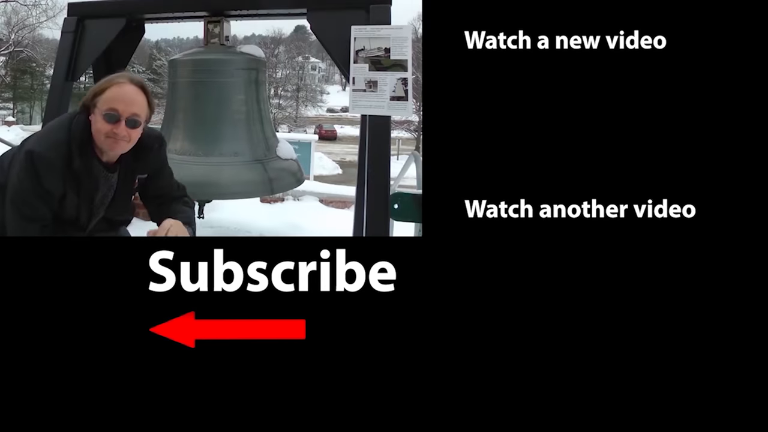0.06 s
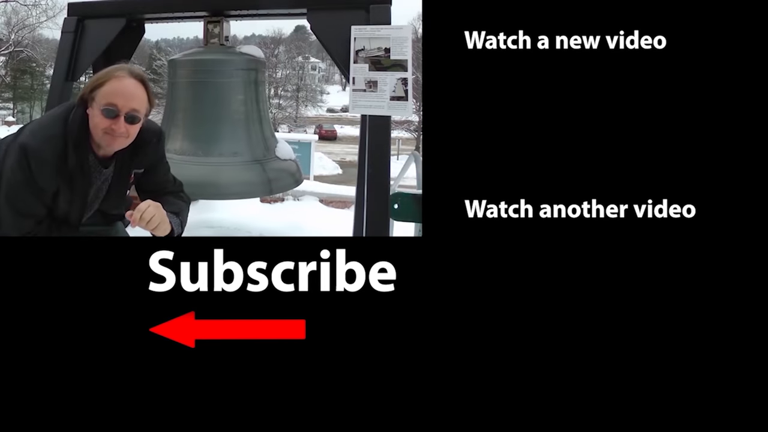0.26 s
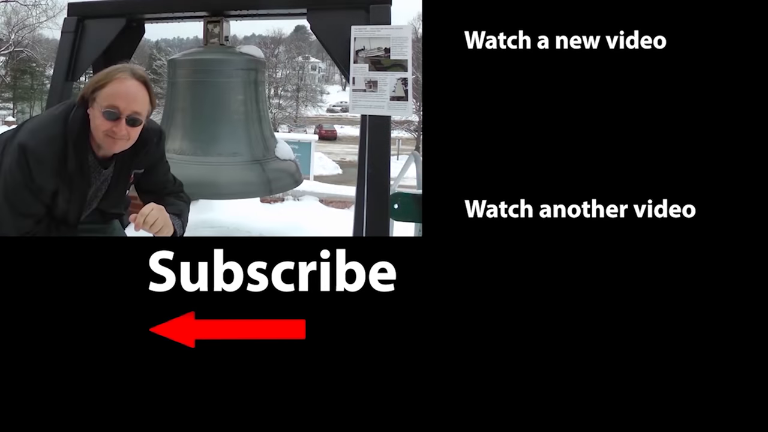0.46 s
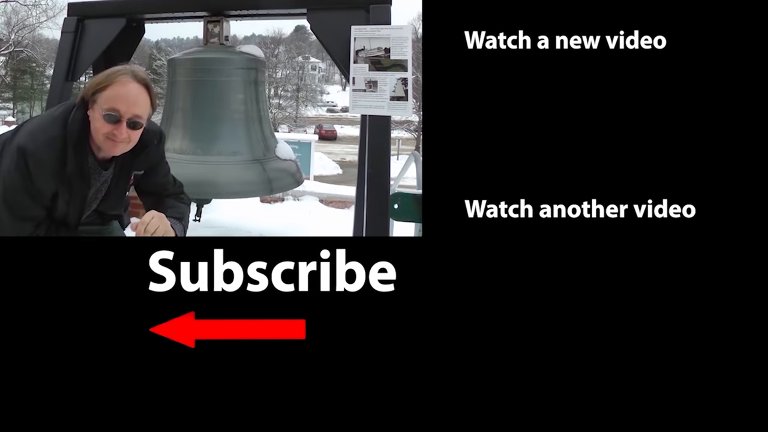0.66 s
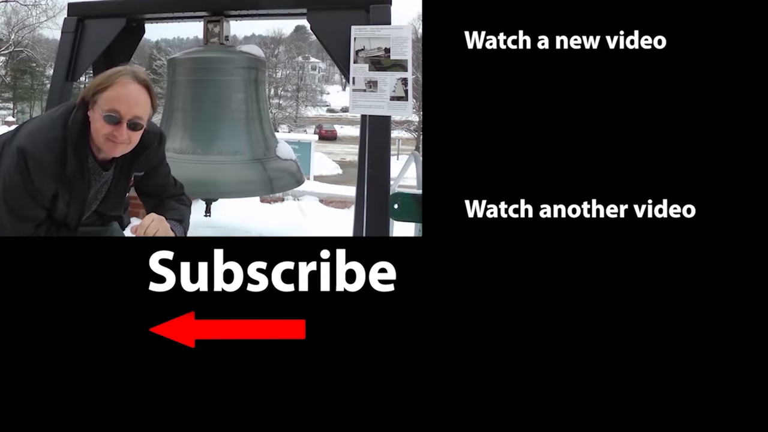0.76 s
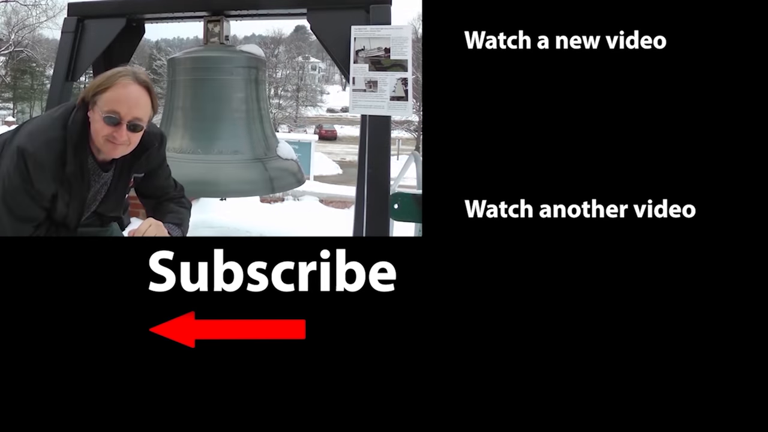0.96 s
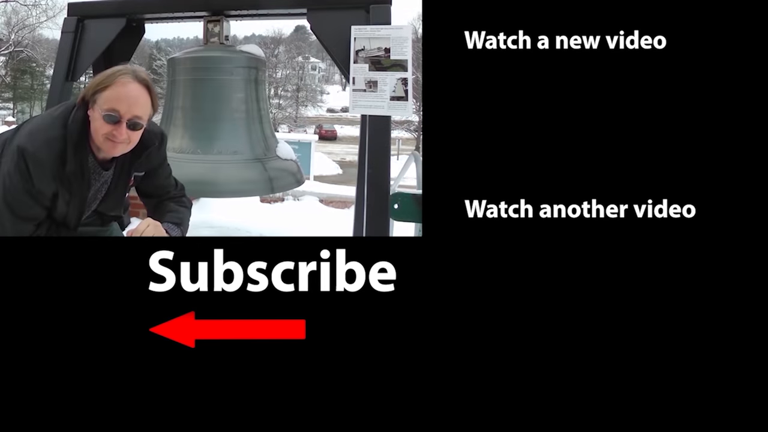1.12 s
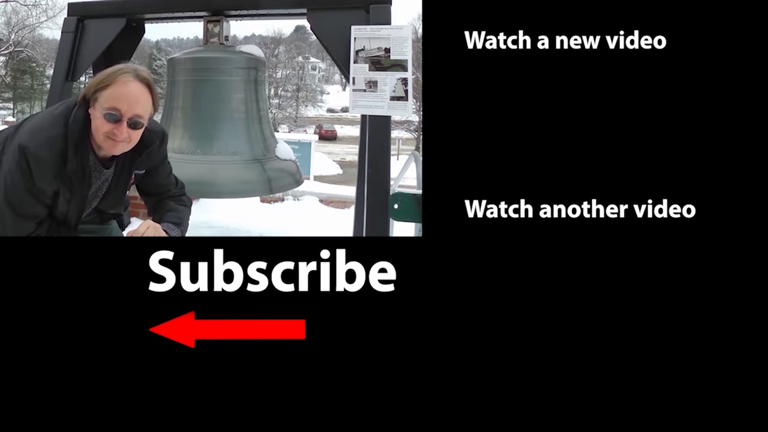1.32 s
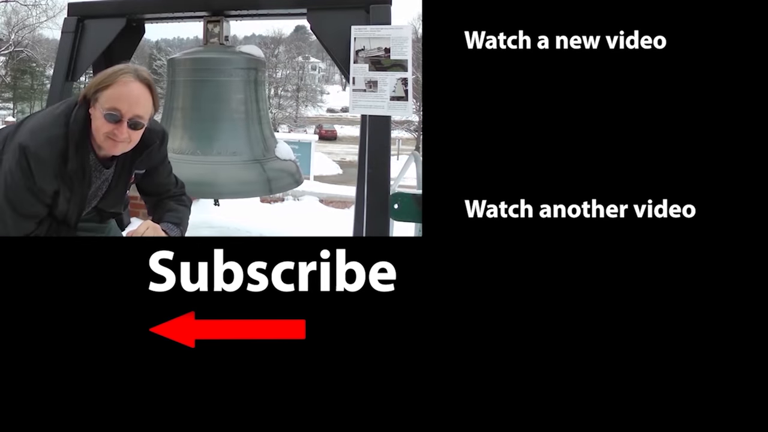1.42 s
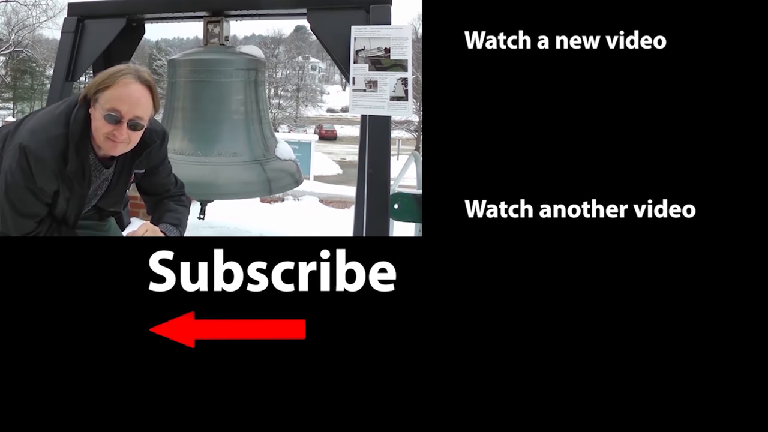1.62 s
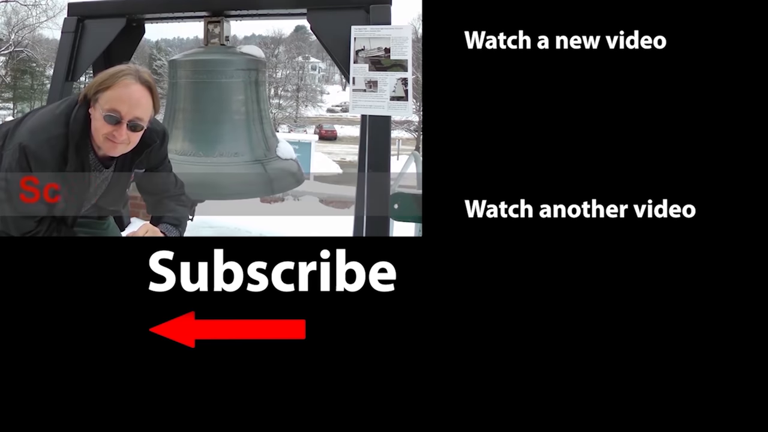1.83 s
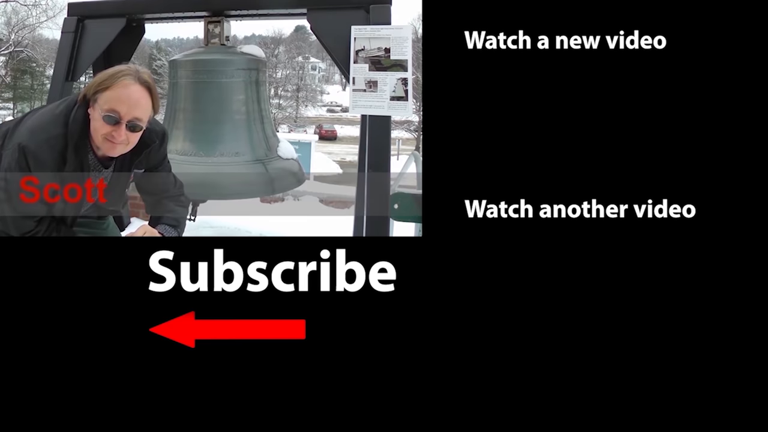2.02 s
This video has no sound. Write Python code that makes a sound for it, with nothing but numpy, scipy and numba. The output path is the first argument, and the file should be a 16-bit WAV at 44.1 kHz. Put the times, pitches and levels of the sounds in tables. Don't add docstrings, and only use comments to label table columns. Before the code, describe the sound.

Close stereo pickup of a heavy bell already ringing in an open snowy yard: dense shimmering tones thin to a steady wavering hum, with soft early wind buffets, later faint squeaks and a low far traffic murmur.

```python
import sys
import numpy as np
from scipy import signal
from scipy.io import wavfile
from numba import njit

SR = 44100
rng = np.random.default_rng(int(sys.argv[2]) if len(sys.argv) > 2 else 0)


def output_pcm(signal):
    pcm = np.clip(np.atleast_2d(signal).T, -1, 1) * 32767
    wavfile.write(sys.argv[1], SR, np.round(pcm).astype(np.int16))


def boost(x):
    u = np.asarray(x, float) / 20
    return 10 ** u


N = 91772

# mode_hz, left_minus_right_db, left_lead_rad
OFF_CENTRE = [(417, 0.05, 0.03), (498, -2.5, -0.0076), (826, 1.1, .12), (1034, -3.0, -.1),
              (1233, -0.93, 0.14), (1699, -0.5, .08), (2211, -3, .03)]
SWAY_M_S, SWAY_PERIOD_S, SWAY_FASTEST_APPROACH_S = 0.086, 1.6, 0.95


def beating_pairs(modes, twins):
    t = np.arange(N) / SR
    sway_rate = 2 * np.pi / SWAY_PERIOD_S
    heard_time = t + SWAY_M_S / 343 / sway_rate * np.sin(sway_rate * (t - SWAY_FASTEST_APPROACH_S))
    out = np.zeros((2, N))
    starts = 2 * np.pi * rng.random(len(modes))
    for (hz, db, t60), (split, share, cancel, loss_db), start in zip(modes, twins, starts):
        mode = boost(db - 60 * t / t60) * np.exp(1j * (2 * np.pi * hz * heard_time + start))
        twin = share * boost(-loss_db * t) * np.exp(2j * np.pi * split * (t - cancel))
        wave = mode * (1 - twin)
        near = [row for row in OFF_CENTRE if abs(row[0] / hz - 1) < 0.03]
        _, pan_db, lead = near[0] if near else (0, 0, 0)
        tilt = boost(pan_db / 2) * np.exp(0.5j * lead)
        out += np.real([wave * tilt, wave / tilt])
    return out


# pitch_hz, level_db, t60_s
RIM = [(217.85, -45.9, 40), (416.7, -36.1, 23.9), (498.0, -37.0, 32.93), (825.9, -37.7, 4.63),
       (1233.2, -33.3, 4.7), (1699.0, -37.7, 4.23), (2211.1, -45.4, 3.57), (2756.5, -39.5, 3.38),
       (3326.5, -44.1, 2.8), (3912.4, -53.0, 2.77), (4506.4, -66.1, 3.21), (5105.5, -59.6, 2.55),
       (5712.3, -66.6, 2.54), (6308.5, -66.0, 2.03)]
# split_hz, share (amplitude ratio), cancel_s, extra_loss_db_per_s
RIM_TWINS = [(0.2, 0.072, 0, 0), (0.71, 0.16, 1.3, 4.5), (0.28, 0.15, 1.515, 0.5), (0.33, 0.15, 1.97, -7),
             (0.67, 0.85, 1.301, -1.5), (0.93, 0.3, 0.323, 7.5), (0.69, 0.15, 0.145, 0),
             (1.25, 0.78, 0.07, 16.5), (0.89, 0.5, 0.088, 1.5), (1.8, 0.89, 0.12, 61.5),
             (1.4, 0.93, 0.257, 11.5), (1, 0.087, 0.3, 29.5), (3.1, 0.22, 0.35, 30), (6.8, 0.16, 0.16, 60)]
# pitch_hz, level_db, t60_s
WAIST = [(1033.1, -46.4, 1.37), (1127.8, -45.9, 3.04), (1182.2, -51.4, 3.21), (1426.6, -51.6, 3.51),
         (1526.7, -46.6, 2.2), (1856.9, -60.8, 2.87), (1916.0, -51.4, 2.61), (2469.3, -56.8, 3.53),
         (2911.5, -62.3, 1.99), (3564.8, -59.8, 1.6), (4199.7, -65.1, 1.59), (5059.9, -70.0, 2.0),
         (5484.4, -68.2, 2.01), (5861.4, -66.1, 1.4)]
# split_hz, share (amplitude ratio), cancel_s, extra_loss_db_per_s
WAIST_TWINS = [(5.9, 1.2, 0.057, 28), (0.99, 0.95, 0.101, -5.5), (0.22, 1.5, 0.9, 16.5),
               (0.27, 0.44, 0.88, -1.5), (0.99, 0.42, 0.152, 1), (2.4, 1.6, 0.2, 58.5),
               (2.75, 0.36, 0.218, 57), (0.98, 1.2, 0.032, 28), (3.6, 1.4, 0.81, 28), (2, 1.4, 0.077, 64),
               (2.5, 0.49, 0.2, 61), (3, 1.8, 0.07, 28), (2.25, 0.71, 0.267, 59), (5.7, 0.6, 0.175, 59)]
# pitch_hz, level_db, t60_s
LIP = [(6373.9, -69.9, 2.0), (6712.9, -78.5, 2.45), (6917.7, -69.1, 2.03), (7223.4, -75.6, 2.4),
       (7305.0, -77.0, 2.48), (7519.6, -70.5, 2.15), (8086.2, -70.3, 1.55), (8117.7, -74.4, 2.07),
       (8246.8, -75.5, 1.66), (8554.3, -80.3, 2.03), (8716.2, -77.9, 1.92), (8984.7, -82.2, 2.18),
       (9921.9, -77.8, 1.8), (10884.7, -79.1, 2.01)]
LIP_SPLIT_HZ, LIP_SHARE = 6.0, 0.45


def bell():
    draws = rng.random((len(LIP), 2))
    lip_twins = [(LIP_SPLIT_HZ * (0.1 + a), LIP_SHARE, cancel, 0) for a, cancel in draws]
    rim = beating_pairs(RIM, RIM_TWINS)
    waist = boost(-0.9) * beating_pairs(WAIST, WAIST_TWINS)
    lip = boost(-1.1) * beating_pairs(LIP, lip_twins)
    return rim + waist + lip


SHIMMER_DB, SHIMMER_SPREAD_DB, SHIMMER_FALL_DB = -73, 5.5, 5
SHIMMER_T60_S = 2.4


def shimmer(count=170):
    t = np.arange(N) / SR
    out = np.zeros(N)
    for place, strength, ring, phase in rng.random((count, 4)):
        hz = 900 + 12400 * place ** 1.4
        db = SHIMMER_DB - SHIMMER_FALL_DB * np.log2(hz / 2000) + SHIMMER_SPREAD_DB * (2 * strength - 1)
        t60 = SHIMMER_T60_S * (0.6 + 1.1 * ring) * (hz / 2000) ** -0.3
        out += boost(db - 60 * t / t60) * np.sin(2 * np.pi * (hz * t + phase))
    return out


def slow(rate):
    r = np.exp(-2 * np.pi * rate / SR)
    drift = signal.lfilter([1], [1, -2 * r, r * r], rng.standard_normal(N + SR))[SR:]
    return (drift - drift.mean()) / drift.std()


def at_hz(hz, points, index):
    p = np.array(points)
    return np.interp(np.log(hz), np.log(p[:, 0]), p[:, index])


# band_hz, density_db (per Hz)
YARD = [(25, -13.5), (60, -6), (150, -9), (500, 3), (1200, -17), (3000, -26), (7000, -47.5), (12000, -57.5)]
YARD_DB, YARD_ALIKE, YARD_PATCHY_DB = -64, 0.85, 1


def yard():
    out = 0
    edges = 20 * 2 ** np.arange(0, 9.6, 0.5)
    white = rng.standard_normal((2, 2, N))
    for k, (low, high) in enumerate(zip(edges, edges[1:])):
        band = signal.butter(2, [low, high], "band", fs=SR, output="sos")
        mid, side = signal.sosfilt(band, white[k % 2])
        gain = boost(at_hz(np.sqrt(low * high), YARD, index=1) + YARD_PATCHY_DB * slow(2))
        stereo = np.sqrt(1 + YARD_ALIKE) * mid + np.sqrt(1 - YARD_ALIKE) * side * [[1], [-1]]
        out = out + gain * stereo
    return boost(YARD_DB) * out / out.std()


# centre_s, length_s, level_db
PUFFS = [
    (0.288, 0.17, -62),
    (0.389, 0.067, -64),
    (0.493, 0.033, -56.5),
    (1.118, 0.21, -66.5),
]
PUFF_CUT_HZ, PUFF_RIGHT_DB = 120, -6


def wind():
    t = np.arange(N) / SR
    band = signal.butter(4, [25, PUFF_CUT_HZ], "band", fs=SR, output="sos")
    rumble = signal.sosfilt(band, rng.standard_normal((2, N)))
    shape = sum(boost(db) * np.exp(-((t - s) / length * 2) ** 2) for s, length, db in PUFFS)
    return rumble / rumble.std() * shape * boost(np.array([[0], [PUFF_RIGHT_DB]]))


# start_s, length_s, pitch_hz, level_db
SQUEAKS = [
    (.87, .18, 719, -65.5),
    (1.06, .12, 728, -63),
    (1.28, .07, 722, -63),
    (1.729, .16, 717, -62.5),
    (1.9, .07, 716, -72.5),
    (2.01, .1, 722, -70),
]
SQUEAK_EDGE_S, SQUEAK_WOBBLE, SQUEAK_2ND_DB, SQUEAK_3RD_DB = 0.015, 0.0042, -9, -21


def pivot():
    t = np.arange(N) / SR
    out = np.zeros(N)
    wobble = 1 + SQUEAK_WOBBLE * slow(7.8)
    grip = boost(1.1 * slow(20))
    for s, length, hz, db in SQUEAKS:
        turn = 2 * np.pi * hz * np.cumsum(wobble) / SR
        shape = np.clip(np.minimum(t - s, s + length - t) / SQUEAK_EDGE_S, 0, 1)
        overtones = boost(SQUEAK_2ND_DB) * np.sin(2 * turn) + boost(SQUEAK_3RD_DB) * np.sin(3 * turn)
        out += boost(db) * shape * (np.sin(turn) + overtones)
    return out * grip


def scene():
    return bell() + shimmer() + yard() + wind() + pivot()


@njit
def notched_gain(level, gain, ceiling, step, interval):
    out, wait, owed = np.empty(len(level)), 0, 0
    for i in range(len(level)):
        wait -= 1
        if level[i] * gain > ceiling and owed == 0:
            owed = 3
        if owed > 0 and wait <= 0:
            gain /= step
            owed -= 1
            wait = 150
        if i % interval == 0:
            gain *= step
        out[i] = gain
    return out


def low_pass(x):
    return signal.sosfilt(signal.butter(12, 13480, fs=SR, output="sos"), x)


CEILING_DB, START_DB, STEP_DB, RELEASE_DB_S = -21.5, 0.08, 0.55, 44
STEP_S = 0.000025
OUTPUT_CUT_HZ = 10700


def record(dry):
    interval = int(SR * STEP_DB / RELEASE_DB_S)
    level = np.abs(dry).max(axis=0)
    gain = notched_gain(level, boost(START_DB), boost(CEILING_DB), boost(STEP_DB), interval)
    r = np.exp(-1 / (STEP_S * SR))
    gain = signal.lfilter([1 - r], [1, -r], gain - gain[0]) + gain[0]
    left_s = (N - np.arange(N)) / SR
    fade = np.sin(np.clip(left_s / 0.003, 0, 1) * np.pi / 2) ** 2
    mix = signal.lfilter(*signal.butter(2, OUTPUT_CUT_HZ, fs=SR), dry * gain * fade)
    return low_pass(mix)


dry = scene()
out = record(dry)
output_pcm(out)
```